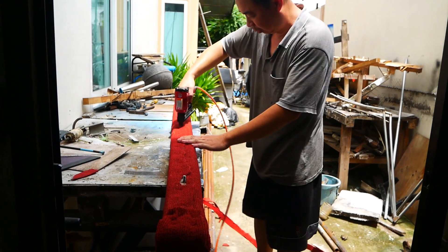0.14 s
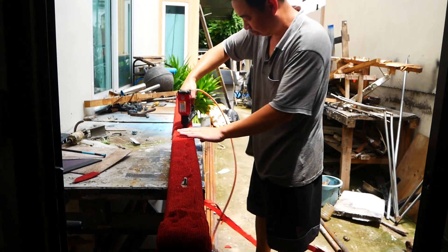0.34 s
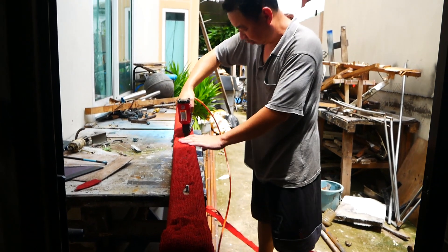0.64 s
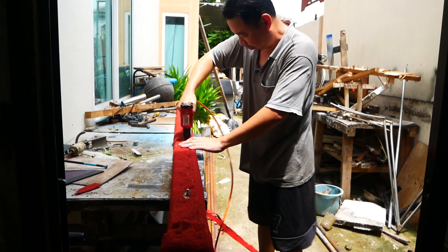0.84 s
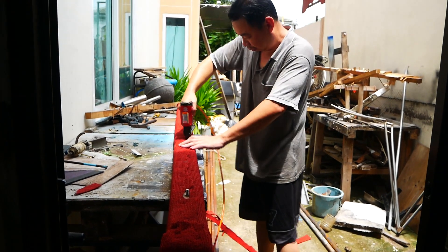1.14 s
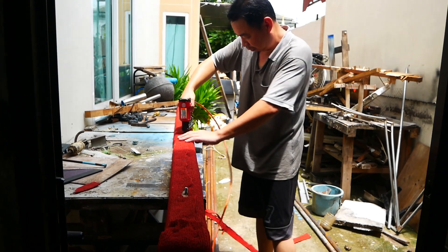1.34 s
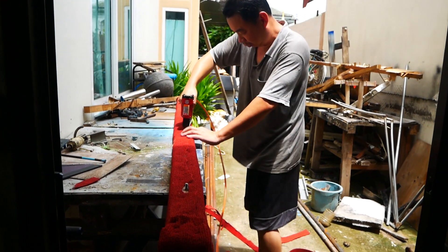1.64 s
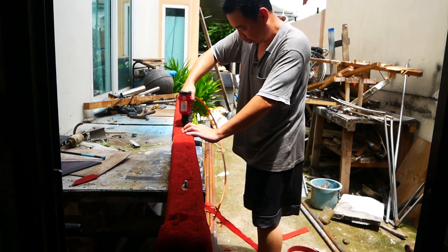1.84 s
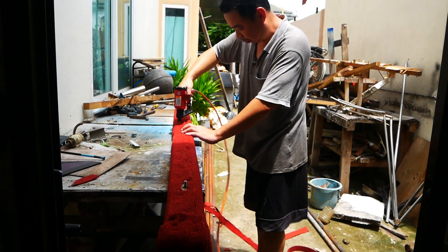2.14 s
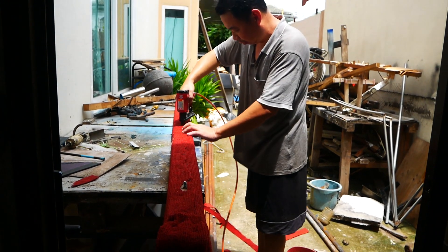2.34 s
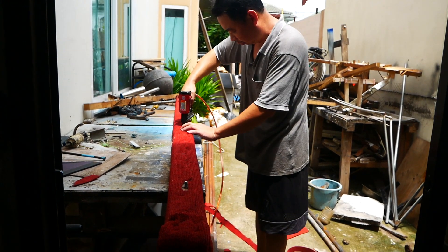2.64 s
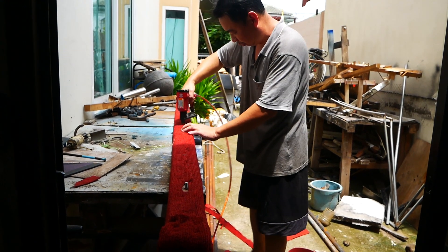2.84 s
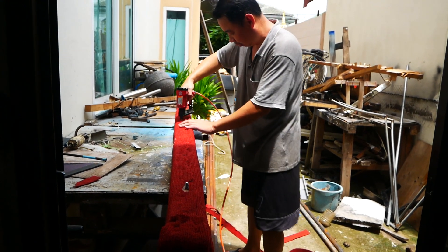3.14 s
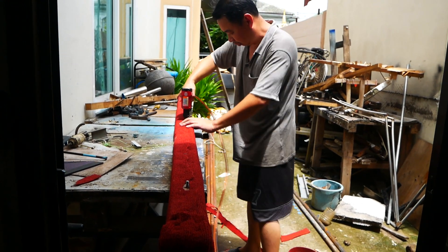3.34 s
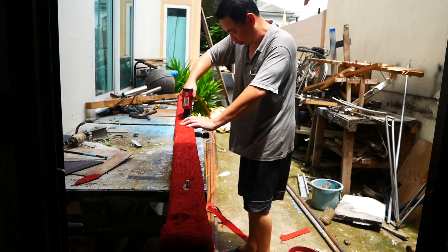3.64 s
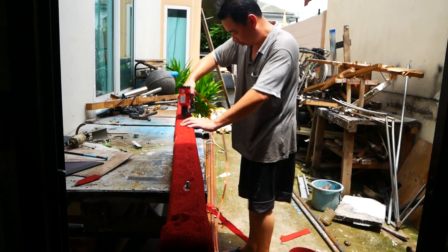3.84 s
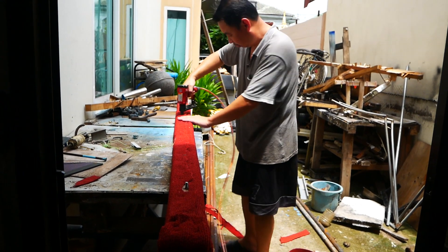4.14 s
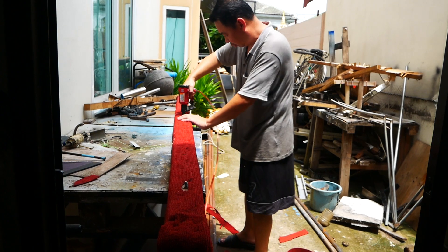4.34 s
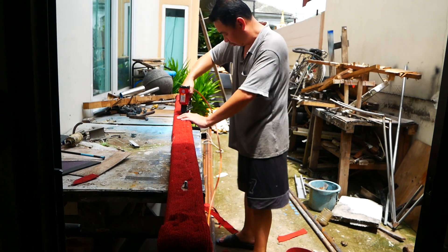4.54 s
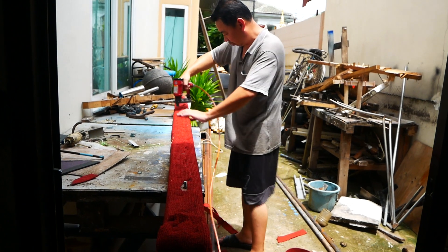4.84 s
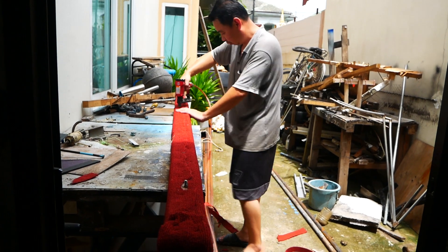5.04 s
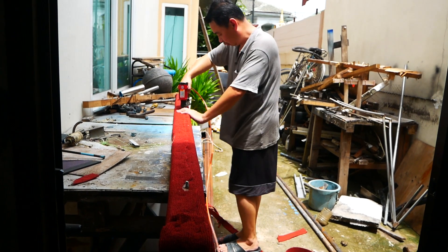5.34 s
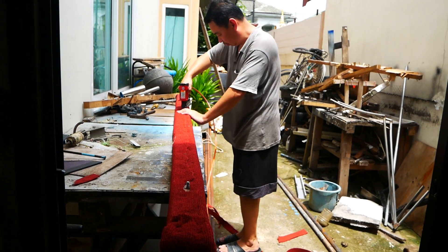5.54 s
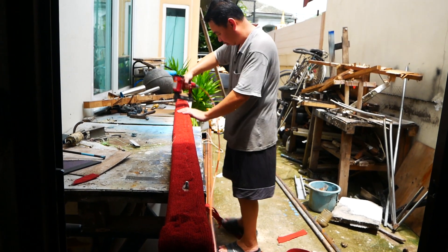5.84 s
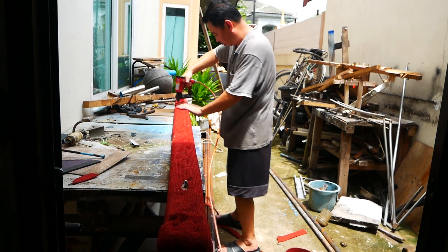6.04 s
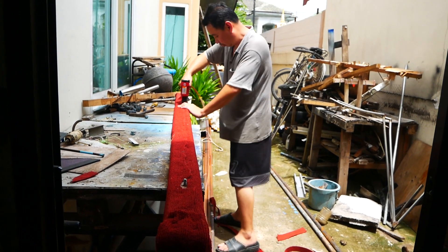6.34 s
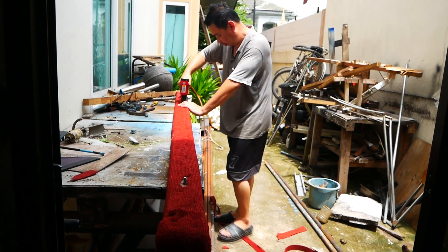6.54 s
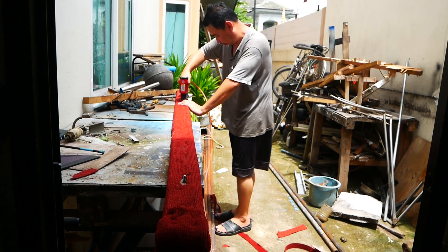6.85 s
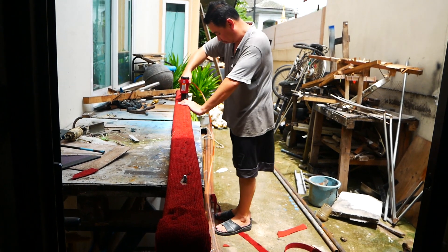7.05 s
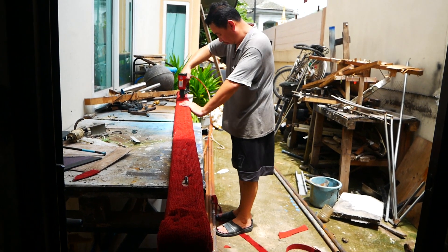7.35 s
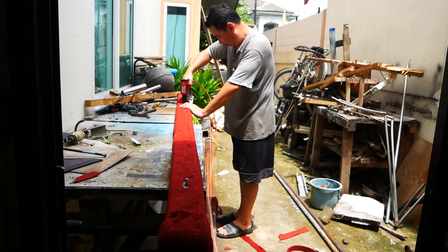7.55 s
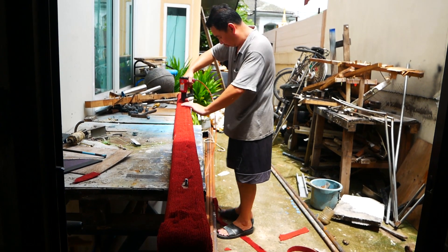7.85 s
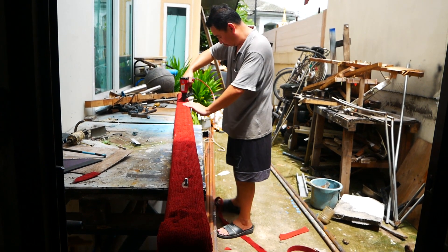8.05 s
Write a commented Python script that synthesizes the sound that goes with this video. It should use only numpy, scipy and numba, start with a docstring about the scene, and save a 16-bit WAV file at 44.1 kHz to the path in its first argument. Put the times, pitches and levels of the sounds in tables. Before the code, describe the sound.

Unevenly spaced staple gun blows knock into a board in a small walled yard, hissing and clicking, above a constant airy machine rush.

```python
"""The echoes of an exhaust spit die away while a steady rush of air, faintly droning, swells up in a small walled yard.
A pneumatic staple gun then tacks cloth to a wooden board, shot after shot. In each the trigger valve hisses (noise
that swells and dies), the driver slams the staple home (noise bursts, a damped thump and ringing modes), and on
release the exhaust spits and the piston clicks back (shaped noise again). Automatic gain ducks at every shot, so
the background swells back after each and sinks over a run of them."""
import sys
import numpy as np
from scipy import signal
from scipy.fft import rfft, irfft, next_fast_len
from scipy.io import wavfile
from scipy.ndimage import uniform_filter1d
from numba import njit

SR = 44100
rng = np.random.default_rng(int(sys.argv[2]) if len(sys.argv) > 2 else 0)


def wav_out(sig):
    """Save sig, one row per channel (or a flat mono array), as 16-bit PCM at SR to the path in sys.argv[1]."""
    wavfile.write(sys.argv[1], SR, np.round(np.clip(np.atleast_2d(sig).T, -1, 1) * 32767).astype(np.int16))


N = 362061

# All event and source levels below are relative; each source's own gains are added to them.
# spectrum of the exhaust jet: (frequency [Hz], relative density [dB])
EXHAUST_SPECTRUM = [(100, -28.5), (1200, -24), (3200, -17.5), (4300, -13.5), (5200, -9.5), (6300, -14.5),
                    (7400, -9.5), (9000, -3.5), (10200, 2.5), (11500, -1.5), (13000, -10), (15500, -21)]
# trigger releases: (time [s], exhaust level [dB])
RELEASES = [(-.075, 7.5), (1.1112, 3.5), (1.8257, 4.5), (2.7753, 6), (3.7813, 4.5), (4.6847, 7),
            (5.7343, 4), (7.145, 4), (7.7695, 6)]
# spectrum of the piston's click at its stop: (frequency [Hz], relative density [dB])
CLICK_SPECTRUM = [(60, -28), (300, -16), (1000, 5), (2600, 1), (5200, -7.5), (7500, 5.5), (10300, -3.5),
                  (15000, -25)]
# spectrum of the machine rush: (frequency [Hz], relative density [dB])
RUSH_SPECTRUM = [(25, -50), (60, -21), (100, -9), (190, -7), (300, 0), (430, 0.5), (560, -6.5), (1020, -4),
                 (1400, -11.5), (1850, -13.5), (3000, -18), (6000, -29), (15000, -47)]
# spectrum of the thin air hiss: (frequency [Hz], relative density [dB])
AIR_HISS_SPECTRUM = [(1000, -15), (4000, -5.5), (7300, -5), (10100, 0), (11500, -7.5), (13000, -18),
                     (15500, -39)]
# a motor's drone within the rush: (frequency [Hz], level relative to the rush [dB])
DRONE_LINES = [(377, -16), (587, -22.5), (888, -26), (974, -18), (1098, -36), (1825, -19.5)]
# likeness of the two channels in a diffuse field: (frequency [Hz], likeness [0-1])
LIKENESS = [(100, 0.82), (400, 0.95), (1400, 0.89), (4500, 0.79), (12000, 0.61)]
# microphone pair: (frequency [Hz], left minus right level [dB], left phase lead [rad])
PORT_RESPONSE = [(60, -6, 3), (387, -8, 2.5), (1290, -7, 1.9), (2560, -2, 0.99), (4540, -0.5, 0.74),
                 (9600, 3, 0), (15000, 2, 0.8)]
# shots: (time [s], steel crack level [dB], wood knock level [dB], trigger squeeze [s],
#         board ring frequency [Hz], recoil tap level [dB]); of the last, only the valve is heard before the end
SHOTS = [(1.0157, 3, 4, .011, 1650, 3), (1.7469, 6, 6, .024, 1440, 5), (2.6912, 6.5, 3.5, 0.011, 1580, -3),
         (3.6935, 5.5, 5, 0.018, 1470, 3), (4.5979, 6, 3.5, 0.019, 1570, 0.5),
         (5.6362, 4, -2, 0.0099, 1780, -0.5), (7.0495, 6.5, 3.5, .008, 1780, -2),
         (7.6396, 6.5, 5.5, .02, 1380, -10), (8.232, 6, 5, 0.021, 1500, -1)]
# spectrum of air through the trigger valve: (frequency [Hz], relative density [dB])
VALVE_SPECTRUM = [(100, -19), (1000, -20), (2800, -13.5), (5000, -9.5), (7500, -5), (10300, 0),
                  (12000, -1.5), (15500, -22)]
# spectrum of the driver's crack on steel: (frequency [Hz], relative density [dB])
CRACK_SPECTRUM = [(30, -53), (120, -4.5), (280, 1.5), (700, -2), (1400, 8), (2800, -9.5), (5200, -4.5),
                  (7500, -9), (10300, -2), (13000, -14), (16000, -20)]
# spectrum of the knock in the wood: (frequency [Hz], relative density [dB])
KNOCK_SPECTRUM = [(60, -25), (160, -18), (280, 0.5), (520, -10), (730, -0.5), (1100, -1), (1500, 4),
                  (2100, 1.5), (2800, -2), (3600, -3.5), (5300, -5), (7500, -20), (10200, -7), (15000, -34)]
# modes of gun and board together, before their random shifts: (frequency [Hz], level [dB], t60 [s])
GUN_MODES = [(282, -4, 0.04), (396, -10, 0.067), (698, 11.5, 0.017), (960, 9, 0.055), (1454, -21, 0.068),
             (1650, -20, .05), (1913, 4.5, 0.081), (2160, -14, 0.075), (2330, -1, 0.04), (2770, -19, .045),
             (2940, -9, .045), (3340, -33, .045), (3920, 0, .045), (4120, -13, 0.037), (4930, 2, .04),
             (7450, 8, 0.065)]
# spectrum of light, bright steel contacts: (frequency [Hz], relative density [dB])
TICK_SPECTRUM = [(100, -31), (1000, 5.5), (2800, 0.5), (5000, -3.5), (7500, -4), (10300, 1), (13000, -16),
                 (15500, -27)]
# the gun's nose is set on the board: (time [s], level [dB])
TOUCHES = [(5.048, -25.5), (5.344, -26), (6.9225, -18), (7.5722, -21.5), (7.577, -25)]
# soft low bumps, some around the touches, two with the exhaust puffs as the gun lifts off:
# (time [s], level [dB], frequency [Hz])
BUMPS = [(6.928, -55, 90), (6.970, -40, 100), (7.152, -27, 155), (7.715, -47, 80), (7.765, -32, 151)]

CUTOFF_HZ = 16000
MARGIN = SR // 2   # samples of working room before and after the scene
TOTAL = next_fast_len(N + 2 * MARGIN, real=True)
AGE = np.arange(SR // 4) / SR   # seconds since an event began
FILL_S = 0.0175   # the piston fires this long after the valve is fully open
RETURN_S = 0.0212   # the piston is back at its top stop this long after a release
WALK_DB_PER_S = 0.1   # valve and hose hiss grow fainter as the gun moves away along the board
RUSH_DB = -30.0   # steady
HISS_DB = -43.5   # at time zero


def from_db(db):
    """Logarithmic level: every 20 dB is a tenfold amplitude."""
    return 10 ** (np.asarray(db) / 20)


def rms_one(x):
    """Normalisation of power: the mean square becomes one."""
    return x / np.sqrt(np.mean(x ** 2) + 1e-20)


def over_bins(table, size, axis=1):
    """Log-frequency interpolation: one column of a table is read at every FFT bin."""
    table = np.array(table, float)
    bin_hz = np.arange(size // 2 + 1) * SR / size
    return np.interp(np.log(bin_hz + 1), np.log(table[:, 0]), table[:, axis])


def colour(x, spectrum):
    """Minimum phase: folding the cepstrum gives a causal filter of unit power with the given spectrum."""
    size = x.shape[-1]
    magnitude = rms_one(from_db(over_bins(spectrum, size)))
    cepstrum = irfft(np.log(magnitude), size)
    cepstrum[1:size // 2] *= 2
    cepstrum[size // 2 + 1:] = 0
    response = np.exp(rfft(cepstrum))
    return irfft(rfft(x) * response, size)


def diffuse(size):
    """Diffuse-field coherence: white stereo noise, with the likeness of its channels set by frequency."""
    alike = np.clip(over_bins(LIKENESS, size), 0, 1)
    mid, side = rfft(rng.standard_normal((2, size)))
    mid = mid * np.sqrt((1 + alike) / 2)
    side = side * np.sqrt((1 - alike) / 2)
    return irfft(np.array([mid + side, mid - side]), size)


def fade(t60, age=AGE):
    """Exponential decay: the level falls by 60 dB in each t60 [s]."""
    return from_db(-60 * age / t60)


def burst(rise, t60):
    """Transient noise: a linear swell over the rise [s], then exponential decay."""
    swell = np.minimum(AGE / rise, 1)
    decay = fade(t60, np.maximum(AGE - rise, 0))
    return rng.standard_normal(len(AGE)) * swell * decay


def ring(hz, t60):
    """Free vibration: one struck mode is a decaying sine, of random polarity."""
    return rng.choice([-1, 1]) * np.sin(2 * np.pi * hz * AGE) * fade(t60)


def add(track, s, sound):
    """Superposition: a sound is summed into the track at time s [s]."""
    at = MARGIN + round(s * SR)
    track[at:at + len(sound)] += sound[:len(track) - at]


def exhaust(spit_db=4.0, trail_db=-4.0, puff_db=-10.5, puff_hz=240, click_db=-7.0):
    """Jet noise: the cylinder dumps its air in a spit with a low puff, then the piston clicks on its top stop."""
    air, puffs, clicks = np.zeros((3, TOTAL))
    for s, db in RELEASES:
        spit = from_db(spit_db) * burst(rise=0.0022, t60=0.021)
        trail = from_db(trail_db) * burst(rise=0.0079, t60=0.089)
        add(air, s, from_db(db) * (spit + trail))
        puff = ring(puff_hz, t60=0.017) * np.minimum(AGE / 0.0013, 1)
        add(puffs, s, from_db(db + puff_db) * puff)
        add(clicks, s + RETURN_S, from_db(db + click_db) * burst(rise=0.00043, t60=0.017))
    return colour(air, EXHAUST_SPECTRUM) + puffs + colour(clicks, CLICK_SPECTRUM)


def bench_scatter(level_db=-9.5, delay_s=0.0011, t60=0.02):
    """Early reflection: tools and boards on the bench scatter sound differently to each port."""
    age = np.arange(SR) / SR
    onset = np.clip(age / delay_s - 1, 0, 1)
    early = rng.standard_normal((2, SR)) * fade(t60, age) * onset
    return from_db(level_db) * early / np.linalg.norm(early, axis=1, keepdims=True)


def wall_tail(low_db=-2.0, high_db=-4.0, low_t60=0.42, high_t60=0.32, split_hz=4000, build_s=0.023):
    """Reverberation: close walls and clutter throw back a dense tail whose treble dies first."""
    age = np.arange(SR) / SR
    scatter = diffuse(SR) * np.minimum(age / build_s, 1)
    low = signal.sosfilt(signal.butter(2, split_hz, "low", fs=SR, output="sos"), scatter)
    high = signal.sosfilt(signal.butter(2, split_hz, "high", fs=SR, output="sos"), scatter)
    low_tail = from_db(low_db) * low * fade(low_t60, age)
    high_tail = from_db(high_db) * high * fade(high_t60, age)
    # subtracted, since the two second-order bands are in antiphase at the split
    return (low_tail - high_tail) / np.linalg.norm(fade(low_t60, age))


def yard(x, count=5):
    """Convolution with echo patterns: they crossfade at equal power as the gun walks along the board."""
    place = np.interp(np.arange(TOTAL), [MARGIN, MARGIN + N], [0, count - 1])
    echoes = 0
    for k in range(count):
        nearness = np.sqrt(np.maximum(1 - np.abs(place - k), 0))
        echo_pattern = bench_scatter() + wall_tail()
        echoes = echoes + rfft(x * nearness) * rfft(echo_pattern, TOTAL)
    return irfft(echoes, TOTAL)


def motor_drone(line_width_hz=13.0):
    """Resonance: noise through narrow two-pole filters gives tones that waver."""
    r = np.exp(-np.pi * line_width_hz / SR)   # pole radius
    white = rng.standard_normal(TOTAL)
    drone = np.zeros(TOTAL)
    for hz, db in DRONE_LINES:
        poles = [1, -2 * r * np.cos(2 * np.pi * hz / SR), r * r]
        drone += from_db(db) * rms_one(signal.lfilter([1, 0, -1], poles, white))
    return drone


def background():
    """Turbulence noise: a steady machine rush with its motor's drone, and a thin, slowly fading hiss of air."""
    t = (np.arange(TOTAL) - MARGIN) / SR
    rush = colour(diffuse(TOTAL), RUSH_SPECTRUM) + motor_drone()
    hiss = colour(diffuse(TOTAL), AIR_HISS_SPECTRUM)
    return from_db(RUSH_DB) * rush + from_db(HISS_DB - WALK_DB_PER_S * t) * hiss


def valve(level_db=-11.5, seep_s=0.0045, ease_t60=0.14):
    """Flow noise: air seeps, then rushes through the valve, and eases as pressure evens out before the blow."""
    air = np.zeros(TOTAL)
    for s, _, _, squeeze, _, _ in SHOTS:
        rise = seep_s + squeeze
        opening = np.minimum(AGE / rise, 1)   # with the burst's own swell, a quadratic rise
        gain = from_db(level_db - WALK_DB_PER_S * s)
        add(air, s - FILL_S - rise, gain * burst(rise, t60=ease_t60) * opening)
    return colour(air, VALVE_SPECTRUM)


def gun_ring(spread_db=2.5, detune=0.029):
    """Modal superposition: each blow shares its energy its own way; grip and seating shift the modes a little."""
    total = np.zeros(len(AGE))
    for hz, db, t60 in GUN_MODES:
        gain = from_db(db + spread_db * rng.standard_normal())
        total += gain * ring(hz * (1 + detune * rng.standard_normal()), t60)
    return total


def blows(crack_db=1.5, knock_db=-7.0, thump_db=15.5, thump_low_hz=200, thump_high_hz=500, modes_db=-22.0,
          board_db=-13.5, seat_s=0.0025, seat_db=-9.5, recoil_s=0.0110):
    """Impact: the driver cracks on the staple, seats it in the wood, and the recoiling gun taps down once more."""
    steel, taps, wood, pushes, rings = np.zeros((5, TOTAL))
    for s, steel_db, wood_db, _, board_hz, recoil_db in SHOTS:
        add(steel, s, from_db(steel_db + crack_db) * burst(rise=0.00084, t60=0.0058))
        add(steel, s + seat_s, from_db(steel_db + crack_db + seat_db) * burst(rise=0.00066, t60=0.012))
        add(taps, s + recoil_s, from_db(recoil_db) * burst(rise=0.00046, t60=0.015))
        add(wood, s, from_db(wood_db + knock_db) * burst(rise=0.0029, t60=0.076))
        add(pushes, s, from_db(wood_db + thump_db) * fade(t60=0.00087))
        # the board's strongest note changes as the gun walks along it
        modes = from_db(wood_db + modes_db) * gun_ring()
        board = from_db(wood_db + board_db) * ring(board_hz, t60=0.06)
        add(rings, s + 0.001, modes + board)
    # the board gives under each push: a heavily damped thump
    thump_band = signal.butter(2, [thump_low_hz, thump_high_hz], "band", fs=SR, output="sos")
    thumps = signal.sosfilt(thump_band, pushes)
    noises = colour(steel, CRACK_SPECTRUM) + colour(taps, TICK_SPECTRUM) + colour(wood, KNOCK_SPECTRUM)
    return noises + thumps + rings


def touches(tick_db=-3.5, trail_db=-13.5, bump_db=11.0):
    """Light contact: the steel nose gives bright, brief noise ticks; low, dull bumps are soft-edged decaying sines."""
    ticks, bumps = np.zeros((2, TOTAL))
    for s, db in TOUCHES:
        contact = burst(rise=0.00075, t60=0.028)
        trail = from_db(trail_db) * burst(rise=0.015, t60=0.15)
        add(ticks, s, from_db(db + tick_db) * (contact + trail))
    for s, db, hz in BUMPS:
        bump = ring(hz, t60=0.12) * np.minimum(AGE / 0.0056, 1)
        add(bumps, s, from_db(db + bump_db) * bump)
    return colour(ticks, TICK_SPECTRUM) + bumps


def ports(x):
    """Interchannel level and phase: the left port is weak and nearly inverted in the bass, brighter on top."""
    ratio = from_db(over_bins(PORT_RESPONSE, TOTAL))
    lead = over_bins(PORT_RESPONSE, TOTAL, axis=2)
    pair = np.array([ratio * np.exp(1j * lead), np.ones_like(ratio)])
    equal_power = np.sqrt(2 / (1 + ratio ** 2))
    return irfft(rfft(x) * pair * equal_power, TOTAL)


def scene():
    """Superposition of direct sound, echoes and background at the two ports."""
    gun = exhaust() + valve() + blows() + touches()
    return ports(gun + yard(gun) + background())[:, MARGIN:MARGIN + N]


def leveller(x, knee_db=-16.0, memory_s=3.66, strength=0.6):
    """Slow compression: the more power in the last few seconds, the lower the gain."""
    keep = np.exp(-1 / (memory_s * SR))
    recent_power = signal.lfilter([1 - keep], [1, -keep], np.mean(x ** 2, axis=0))
    return x / (1 + recent_power / from_db(knee_db) ** 2) ** strength


@njit
def ride_gain(allowed, gain, wait, attack, hold, release):
    """Attack, hold and release: gain falls fast to the allowed value, waits, creeps to one (times in samples)."""
    out = np.empty(len(allowed))
    for i in range(len(allowed)):
        if allowed[i] < gain:
            gain += (allowed[i] - gain) / attack
            wait = hold
        elif wait > 0:
            wait -= 1
        else:
            gain += (1 - gain) / release
        out[i] = gain
    return out


def gain_control(x, ceiling_db=-18.0, attack_s=0.0044, hold_s=0.12, release_s=0.26,
                 start_db=-20.5, start_hold_s=0.098):
    """Fast limiting: gain ducks when the level passes the ceiling, and it starts out already ducked."""
    power = uniform_filter1d(np.mean(x ** 2, axis=0), size=32)
    level = np.sqrt(np.abs(power) + 1e-12)
    allowed = from_db(ceiling_db) / level
    gain = ride_gain(allowed, float(from_db(start_db)), start_hold_s * SR,
                     attack_s * SR, hold_s * SR, release_s * SR)
    return x * gain


def record(dry):
    """Recording chain: a narrow microphone notch, slow and fast gain control, clipping, and a treble cutoff."""
    notched = signal.lfilter(*signal.iirnotch(7860, 22.0, fs=SR), dry)   # centre [Hz], quality factor
    clipped = np.clip(gain_control(leveller(notched)), -1, 1)
    top_cut = signal.ellip(8, 0.3, 60, CUTOFF_HZ, fs=SR, output="sos")   # order, ripple [dB], stopband [dB]
    return signal.sosfilt(top_cut, clipped)


dry = scene()
out = record(dry)
wav_out(out)
```